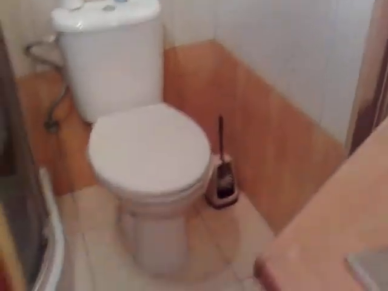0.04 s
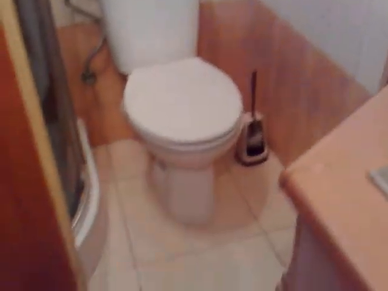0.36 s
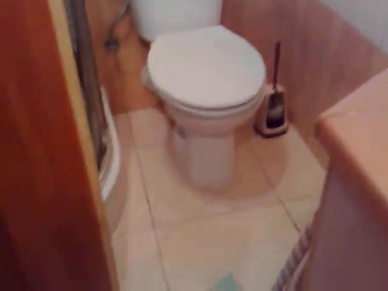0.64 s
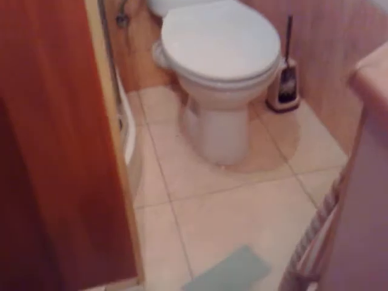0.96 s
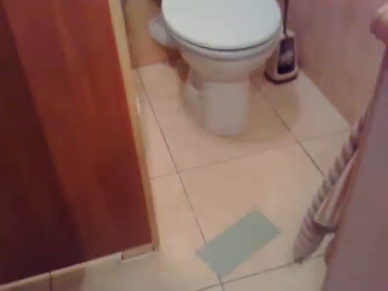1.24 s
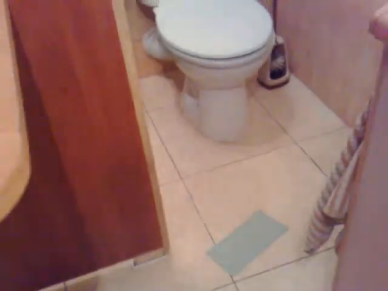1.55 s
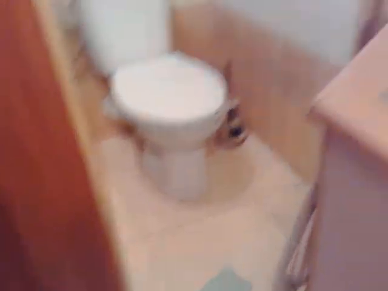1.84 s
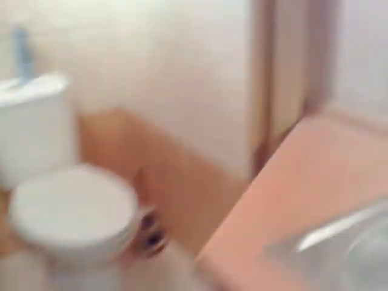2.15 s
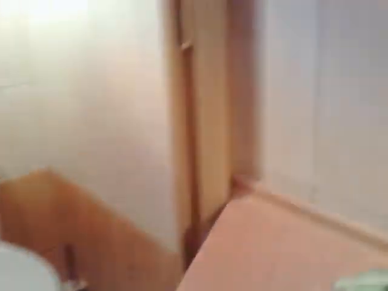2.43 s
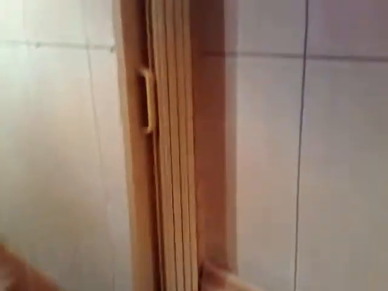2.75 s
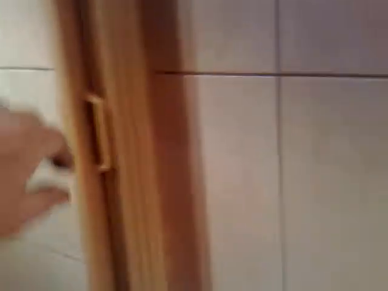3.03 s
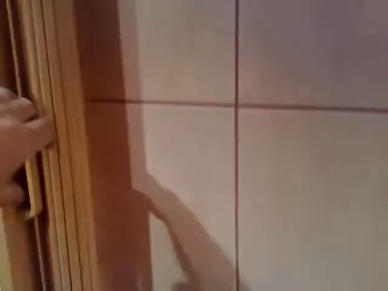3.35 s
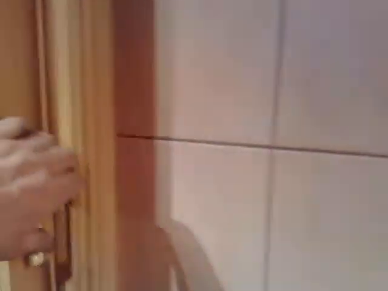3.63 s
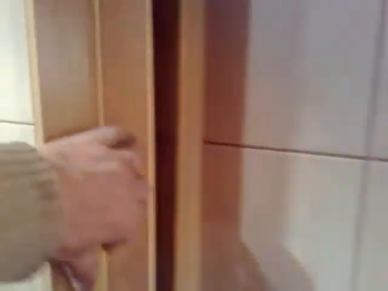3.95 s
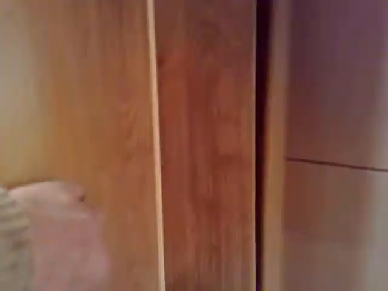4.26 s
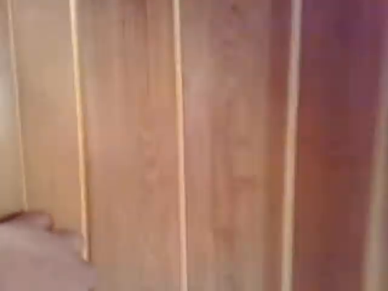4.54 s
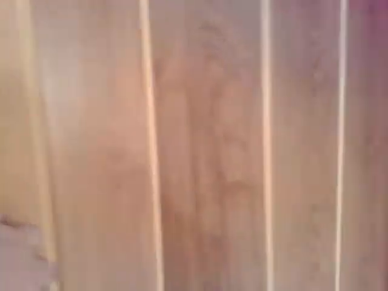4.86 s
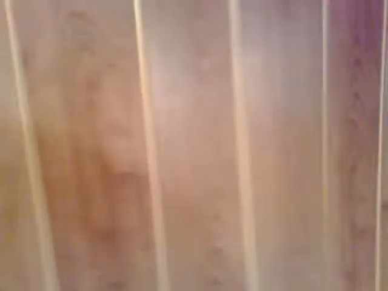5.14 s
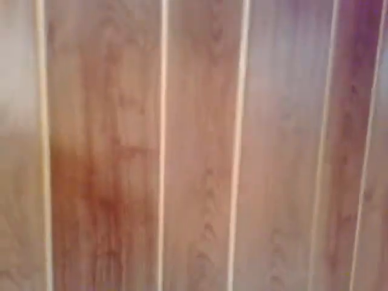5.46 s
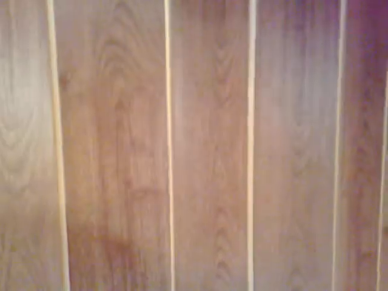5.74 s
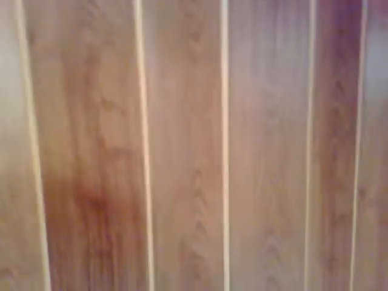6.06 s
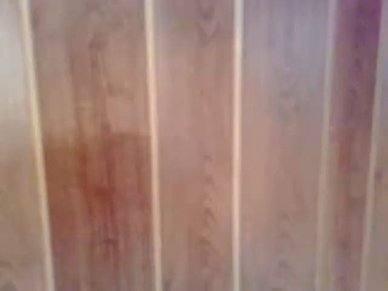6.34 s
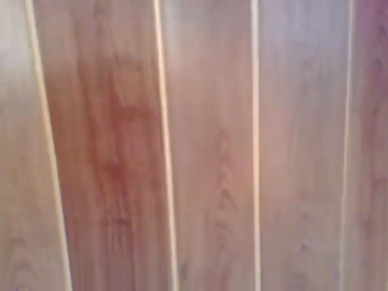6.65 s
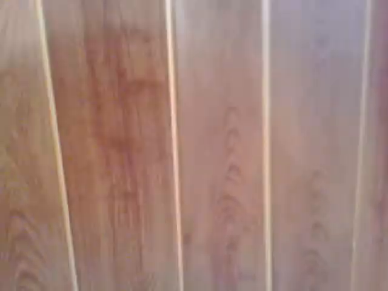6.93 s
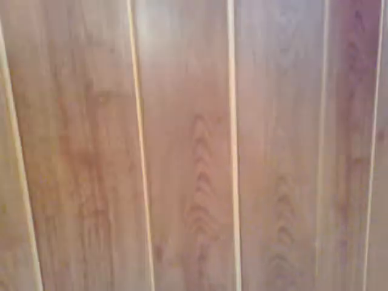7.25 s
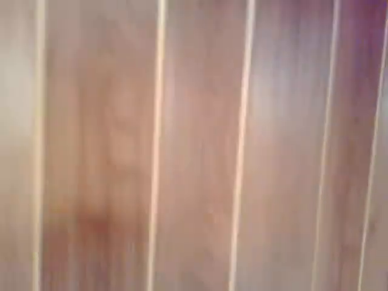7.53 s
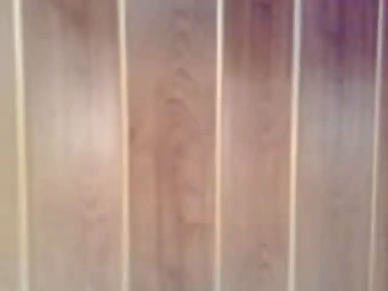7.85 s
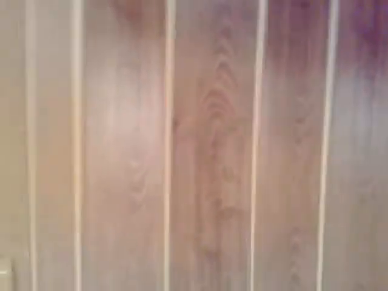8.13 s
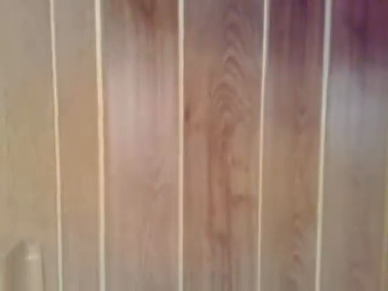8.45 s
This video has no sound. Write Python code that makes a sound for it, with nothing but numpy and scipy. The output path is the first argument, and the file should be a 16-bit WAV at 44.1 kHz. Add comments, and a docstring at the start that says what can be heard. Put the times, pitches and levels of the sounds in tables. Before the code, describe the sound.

A hollow plastic folding door is pulled shut close to the microphone in an echoing bathroom. Quiet footsteps and a light rustle of clothing come first. Then the door scrapes and clatters along its track, squeaks briefly and jerks straight. A second rattling push ends in a loud double clack as it hits the frame, leaving faint room noise and a last dull footstep.

```python
"""Plastic folding door, tiled bathroom

Clothes brush, soft steps thump, and the door is pulled shut close to a handheld camera.
The gliders stick and slip along the track; the hollow slats rattle and snap straight.
A second shove clacks the leading post into its catch. The camera's gain ducks and creeps back."""
import sys
import numpy as np
from scipy import signal
from scipy.fft import rfft, irfft, next_fast_len
from scipy.io import wavfile
from scipy.ndimage import uniform_filter1d, map_coordinates

SR = 44100
rng = np.random.default_rng(int(sys.argv[2]) if len(sys.argv) > 2 else 0)


def transcribe(signal):
    """Save signal, clipped to [-1, 1], as a 16-bit WAV file at the path in sys.argv[1]."""
    frames = np.atleast_2d(signal).T
    limited = np.clip(frames, -1, 1)
    pcm = np.round(limited * 32767).astype(np.int16)
    wavfile.write(sys.argv[1], SR, pcm)


N = 378819
TIME = np.arange(N) / SR

# tiled room decay: f/Hz, t60/s
ROOM_T60 = [(80, 0.91), (170, 0.63), (350, 0.88), (800, 0.96), (1800, 0.74), (3800, 0.62), (6000, 0.41),
            (9000, .25), (12000, 0.29)]
# cloth brushes: t/s, level/dB, centre/Hz, sigma/s
CLOTH_BRUSHES = [(0.192, -61.5, 374, 0.059), (0.36, -59.5, 1200, 0.044), (1.277, -68.5, 2100, 0.2),
                 (1.66, -62.5, 880, 0.11), (2.404, -46, 1500, 0.014), (8.194, -63.5, 447, 0.06)]
# soft steps: t/s, thump/dB, tap/dB
FOOTSTEPS = [(0.982, -38, -55.5), (2.182, -56, -70), (2.333, -53, -59), (2.521, -50.5, -58.5),
             (2.981, -47, -52.5), (3.203, -47.5, -56.5), (8.497, -35.5, -58)]
# glider drag, long pull then second shove: t/s, scrape/dB
GLIDER_DRAG = [(3.3, -62.5), (3.6, -50), (3.7, -53.5), (3.78, -36.5), (3.9, -39.5), (4, -34), (4.16, -42.5),
               (4.25, -34.5), (4.43, -29.5), (4.751, -27.5), (4.9, -32), (5.43, -26.5), (5.7, -46.5),
               (6.03, -42), (6.35, -54.5), (6.54, -36), (6.919, -28), (7.121, -46)]
# resonances, low room modes up to about 310 Hz, hollow slat modes above: f/Hz, width/Hz, level/dB
RESONANCES = [(96, 30, -2), (155.4, 6.6, 4.5), (193.6, 13, -5), (309, 110, -5.5), (714, 51, -8.5),
              (920, 28, -17), (1230, 34, -10), (1605, 230, -6.5), (1786, 43, -7), (1950, 100, -6.5),
              (2240, 130, -5), (2590, 17, -1), (3090, 21, -13), (3260, 17, -8)]
# knocks: the hand grips the handle and leading post (first two rows), then loose slats collide: t/s, clack/dB,
# thud/dB, hardness/0-1
KNOCKS = [(3.447, -33, -45, .55), (3.48, -33.5, -48, 0.4), (3.942, -31, -47, .4),
          (4.043, -31, -36.5, .3), (4.275, -38.5, -38.5, 0.94), (4.444, -31, -38, 1),
          (4.708, -29, -24, 0.82), (4.805, -25, -33, .3), (5.083, -37, -31, 1),
          (5.401, -21.5, -28, .95), (5.854, -39.5, -48, .25), (5.934, -35.5, -40, 0.34),
          (6.007, -33.5, -36.5, 0.45), (6.201, -44.5, -42, .5), (6.324, -43, -37.5, .5),
          (6.443, -24, -27, 0.63), (6.5, -34, -31, .65), (6.606, -27.5, -27, .75),
          (6.652, -23.5, -29, .05), (6.708, -27.5, -33, .2), (6.917, -24, -24.5, 0.9),
          (7.657, -43.5, -50.5, 0.62), (7.858, -50, -53, .7)]
# post tugged loose, then hitting frame and catch: t/s, clack/dB, thud/dB, snap/dB, ring/Hz, rise/s
POST_BLOWS = [(3.71, -28.5, -50, -61, 1600, 0.00093), (7.125, -6, -11, -25, 1660, 0.0015),
              (7.131, -4, -15.5, -11, 2830, 0.0018), (7.142, -11, -4.5, -21.5, 1180, 0.0042),
              (7.26, -8, -22.5, -13.5, 1930, .005), (7.279, -14.5, -26, -21, 2000, .004)]
# handle modes: f/Hz, level/dB
HANDLE_MODES = [(3300, -2), (3750, -3.5), (3960, 2.5), (4400, -4.5), (5200, -17)]
# door jerking straight, levels at mid-swell: t/s, clack/dB, thud/dB, snap/dB, ring/Hz, fold gap/s
FOLD_JERKS = [(4.365, -22, -28.5, -43.5, 1050, .026), (5.256, -7, -14, -16, 1320, 0.022),
              (6.752, -15, -23.5, -30, 1200, .02)]
# spectral shapes: f/Hz, relative level/dB
NOISE_SPECTRUM = [(20, 2.5), (100, -4.5), (200, -9), (500, -13.5), (1300, -19.5), (3000, -28),
                  (7000, -34.5), (10500, -34), (14000, -28.5), (16000, -33.5)]  # room rumble and microphone hiss
THUD_SPECTRUM = [(20, -8), (48, 0), (80, 2.5), (170, -0.5), (330, -4), (480, -9.5), (900, -24), (3000, -81)]  # footfall or flexing panel
TAP_SPECTRUM = [(150, -38), (400, 1.5), (800, 1), (1300, 3), (2500, -10), (6000, -19.5), (15000, -30.5)]  # sole on tile
SCRAPE_SPECTRUM = [(150, -28), (400, -0.5), (560, -1), (1000, 1.5), (1700, -0.5), (2400, -7), (3600, -14),
                   (5500, -22.5), (9000, -34), (15500, -44.5)]  # gliders on track
RUMBLE_SPECTRUM = [(20, -31.5), (50, -20), (85, 0), (170, -2), (230, -1.5), (310, 1), (480, -11.5),
                   (900, -30.5), (3000, -84)]  # slats shaken by sliding
CLACK_SPECTRUM = [(150, -39.5), (400, -4.5), (700, -6), (1050, -1.5), (1450, 1), (1950, -5.5),
                  (3000, -12.5), (4400, -20.5), (6500, -34.5), (12000, -67.5)]  # part ringing at CLACK_REF_HZ
SNAP_SPECTRUM = [(1500, -41.5), (3500, -6), (4800, -1), (7000, -4.5), (10000, -9), (15500, -15)]  # hard slat edge
CLACK_REF_HZ = 1400


def amp(db):
    """dB to amplitude."""
    return 10 ** (np.asarray(db) / 20)


def unit(x):
    """Scale to rms 1."""
    return x / np.sqrt(np.mean(x ** 2) + 1e-20)


def at_level(x, db):
    """Scale a blow to an rms level over its first 30 ms."""
    head = x[:round(.03 * SR)]
    return amp(db) * x / np.sqrt(np.mean(head ** 2))


def along(points, hz):
    """Interpolate (f/Hz, value) points over log frequency."""
    knots_hz, values = np.transpose(points)
    return np.interp(np.log(hz + 1), np.log(knots_hz + 1), values)


def hump(hz, centre_hz, octaves):
    """Bell over log frequency, peak 1."""
    return np.exp(-.5 * (np.log2((hz + 1) / centre_hz) / octaves) ** 2)


def wobble(rate_hz):
    """Smooth curve through random knots."""
    knots = rng.standard_normal(int(N * rate_hz / SR) + 4)
    return map_coordinates(knots, [TIME * rate_hz])


def coloured(x, gain):
    """Minimum-phase filter with magnitude gain(hz)."""
    size = 2 * next_fast_len(len(x) // 2 + 4096)
    magnitude = np.maximum(gain(np.fft.rfftfreq(size, 1 / SR)), 1e-6)
    cepstrum = irfft(np.log(magnitude))
    cepstrum[1:size // 2] *= 2
    cepstrum[size // 2 + 1:] = 0
    return irfft(rfft(x, size) * np.exp(rfft(cepstrum)), size)[:len(x)]


def add(track, start_s, x):
    """Mix x into track."""
    start = round(start_s * SR)
    track[start:start + len(x)] += x[:N - start]


def room(early_db, early_s, rise_s=None):
    """One random room path: dense early burst off door and near walls, long tail, optional build-up."""
    hz, frame_s, noise = signal.stft(rng.standard_normal(SR), SR, nperseg=256)
    decay = amp(-60 * frame_s / along(ROOM_T60, hz)[:, None])
    tail = signal.istft(noise * decay, SR, nperseg=256)[1][:SR]
    t = np.arange(SR) / SR
    path = tail * (1 + amp(early_db) * np.exp(-t / early_s))
    return path * (1 - np.exp(-t / rise_s)) if rise_s else path


def travelling(x, stretches=84):
    """Moving source: each overlapping stretch takes a new room path."""
    out, hop = np.zeros(N), N // stretches
    window = np.sin(np.linspace(0, np.pi, 2 * hop))
    for start in range(0, N - 2 * hop, hop):
        piece = x[start:start + 2 * hop] * window
        path = room(early_db=10.5, early_s=.013)
        add(out, start / SR, signal.fftconvolve(piece, path / np.linalg.norm(path)))
    return out


def stick_slip(rate_hz, scatter_db):
    """Friction: tiny impulses of uneven size at random times."""
    impulses = (rng.random(N) < rate_hz / SR) * rng.choice([-1, 1], N)
    return unit(impulses * amp(scatter_db * rng.standard_normal(N)))


def background(whine_hz=12452, half_width_hz=170):
    """Wavering room rumble and microphone hiss; thin, fuzzy electronic whine."""
    floor = coloured(rng.standard_normal(N), lambda hz: amp(along(NOISE_SPECTRUM, hz)))
    whine = coloured(rng.standard_normal(N), lambda hz: 1 / (1 + ((hz - whine_hz) / half_width_hz) ** 2))
    return amp(-58 + .7 * wobble(rate_hz=4.6)) * unit(floor) + amp(-81) * unit(whine)


def clothes():
    """Cloth brushes past in short grainy swells."""
    out = np.zeros(N)
    fibres = stick_slip(rate_hz=3000, scatter_db=.5)
    for peak_s, db, centre_hz, sigma_s in CLOTH_BRUSHES:
        band = coloured(fibres, lambda hz: amp(35 * hump(hz, centre_hz, octaves=1.57)))
        swell = np.exp(-.5 * ((TIME - peak_s) / sigma_s) ** 2)
        out += unit(band) * amp(db) * swell
    return travelling(out)


def steps(boom_hz=123):
    """Soft soles: a low thump booming in the room, plus a faint tap."""
    out = np.zeros(N)
    for start_s, thump_db, tap_db in FOOTSTEPS:
        boom = room(early_db=7.5, early_s=.039)
        thump = coloured(boom, lambda hz: amp(along(THUD_SPECTRUM, hz) + 12.2 * hump(hz, boom_hz, .45)))
        sole = room(early_db=4, early_s=.026, rise_s=.0039)
        tap = coloured(sole, lambda hz: amp(along(TAP_SPECTRUM, hz)))
        add(out, start_s, at_level(thump, thump_db) + at_level(tap, tap_db))
    return out


def resonance_gain(hz):
    """Low room modes and hollow slat resonances over a flat bed."""
    return 1 + sum(amp(db) / (1 + (2 * (hz - mode_hz) / width_hz) ** 2)
                   for mode_hz, width_hz, db in RESONANCES)


def gliders(firm_scrape_db=-30, firm_rumble_db=-32, rumble_db_per_db=.84):
    """Gliders slip along the track in clumps, scraping and shaking the slats."""
    drag_s, drag_db = np.transpose(GLIDER_DRAG)
    scrape_db = np.interp(TIME, drag_s, drag_db, left=-120, right=-120)
    rumble_db = firm_rumble_db + rumble_db_per_db * (scrape_db - firm_scrape_db)
    slips = stick_slip(rate_hz=520, scatter_db=4) * amp(1.6 * wobble(rate_hz=35))
    scrape = coloured(slips, lambda hz: amp(along(SCRAPE_SPECTRUM, hz)) * np.sqrt(resonance_gain(hz)))
    rumble = coloured(slips, lambda hz: amp(along(RUMBLE_SPECTRUM, hz)) * resonance_gain(hz))
    return unit(scrape) * amp(scrape_db) + unit(rumble) * amp(rumble_db)


def contact(clack_db, thud_db, snap_db, ring_hz, rise_s):
    """One blow: the panel flexes (thud), a slat rings (clack), its hard edge snaps."""
    strike = room(early_db=12, early_s=.037, rise_s=rise_s)  # slats meet one after another
    flex = room(early_db=6.5, early_s=.035, rise_s=rise_s + .0027)  # the panel swings later
    bass_db = .26 * min(thud_db + 8, 0)  # harder blows shake it deeper
    size_ratio = CLACK_REF_HZ / ring_hz  # smaller parts ring higher

    def panel_gain(hz):
        return amp(along(THUD_SPECTRUM, hz) + bass_db * hump(hz, 39, octaves=.5)) * resonance_gain(hz)

    thud = coloured(flex, panel_gain)
    clack = coloured(strike, lambda hz: amp(along(CLACK_SPECTRUM, hz * size_ratio)) * resonance_gain(hz))
    snap = coloured(strike, lambda hz: amp(along(SNAP_SPECTRUM, hz)))
    return at_level(thud, thud_db) + at_level(clack, clack_db) + at_level(snap, snap_db)


def knocks(soft_db=-37, hard_db=-11):
    """The hand knocks the post as it grips, then loose slats knock together; harder contact, more snap relative
    to the clack."""
    out = np.zeros(N)
    for start_s, clack_db, thud_db, hardness in KNOCKS:
        snap_db = clack_db + soft_db + hardness * (hard_db - soft_db)
        add(out, start_s, contact(clack_db, thud_db, snap_db, ring_hz=1375, rise_s=.0032))
    return out


def post():
    """The stiff leading post comes loose, later strikes frame and catch."""
    out = np.zeros(N)
    for start_s, *blow in POST_BLOWS:
        add(out, start_s, contact(*blow))
    return out


def handle(start_s=3.7295, direct_peak_db=-21.5, t60_s=.017, rise_s=.0006, room_db=-1):
    """The small plastic handle ticks once as the grip takes hold."""
    out, t = np.zeros(N), np.arange(SR // 10) / SR
    ring = sum(amp(db) * np.sin(2 * np.pi * (hz * t + rng.random())) for hz, db in HANDLE_MODES)
    crack = .97 * rng.standard_normal(len(t))
    envelope = amp(-60 * t / t60_s) * (1 - np.exp(-t / rise_s))
    tick = coloured((ring + crack) * envelope, lambda hz: amp(21 * hump(hz, 4100, octaves=1)))
    tick = amp(direct_peak_db) * tick / np.abs(tick).max()
    path = room(early_db=23, early_s=.018)
    add(out, start_s, tick)
    add(out, start_s, amp(room_db) * signal.fftconvolve(tick, path / np.linalg.norm(path)))
    return out


def jerks(folds=4, peak_fold=1.5, fall_db_per_fold2=2.2, thud_db_per_fold=2.5, snap_db_per_fold=2):
    """A jerk runs through the folds: contacts swell and fade, thud and snap gaining on the clack."""
    out = np.zeros(N)
    for start_s, clack_db, thud_db, snap_db, ring_hz, gap_s in FOLD_JERKS:
        for fold in range(folds):
            past_peak = fold - peak_fold
            blow = contact(clack_db, thud_db + thud_db_per_fold * past_peak,
                           snap_db + snap_db_per_fold * past_peak, ring_hz, rise_s=.004)
            add(out, start_s + fold * gap_s, amp(-fall_db_per_fold2 * past_peak ** 2) * blow)
    return out


def singing_glider(start_s=4.77, level_db=-32, start_hz=1760, sag_hz_per_s=250):
    """One glider sings at full speed; its hoarse note sags as the door slows."""
    age_s = TIME - start_s
    carrier = np.exp(2j * np.pi * np.cumsum(start_hz - sag_hz_per_s * age_s) / SR)
    smear = wobble(rate_hz=420) + 1j * wobble(rate_hz=420)  # uneven slips widen the note
    corners_s = np.cumsum([0, .055, .18, .23])  # attack, hold, release
    envelope = np.interp(age_s, corners_s, [0, 1, 1, 0])
    return amp(level_db) * unit((carrier * smear).real) * envelope


def scene():
    """Door, person and room at one microphone."""
    door = knocks() + jerks() + post() + handle() + travelling(gliders() + singing_glider())
    return (door + steps() + clothes() + background())[None]


def gain_control(x, threshold_db, recover_db_per_s):
    """Gain drops at once above the threshold, then climbs back slowly."""
    level_db = 10 * np.log10(np.abs(uniform_filter1d(x ** 2, size=300)) + 1e-12)
    excess_db = np.maximum(level_db - threshold_db, 0)
    climb_db = recover_db_per_s * TIME
    cut_db = np.maximum.accumulate(excess_db + climb_db) - climb_db
    return x * amp(-cut_db)


def record(dry):
    """Camera: automatic gain, soft peak clipping, band limit."""
    ceiling, top_hz = .72, 15850
    ducked = gain_control(dry[0], threshold_db=-10.5, recover_db_per_s=11.5)
    rounded = ducked / (1 + np.abs(ducked / ceiling) ** 6) ** (1 / 6)
    passband = np.fft.rfftfreq(N, 1 / SR) < top_hz
    return irfft(rfft(rounded) * passband, N)[None]


dry = scene()
out = record(dry)
transcribe(out)
```